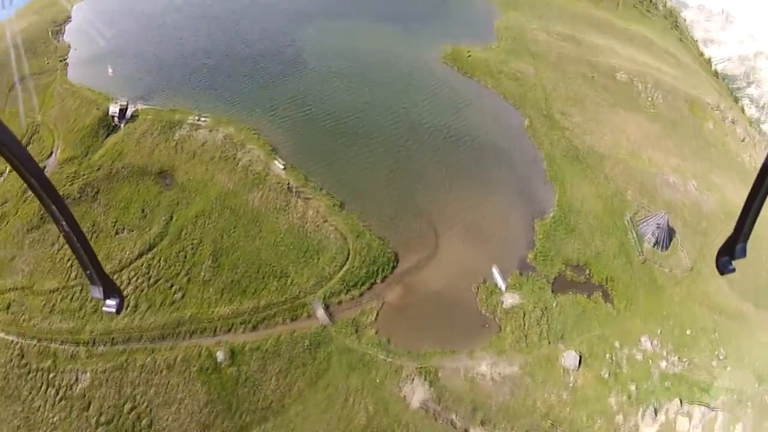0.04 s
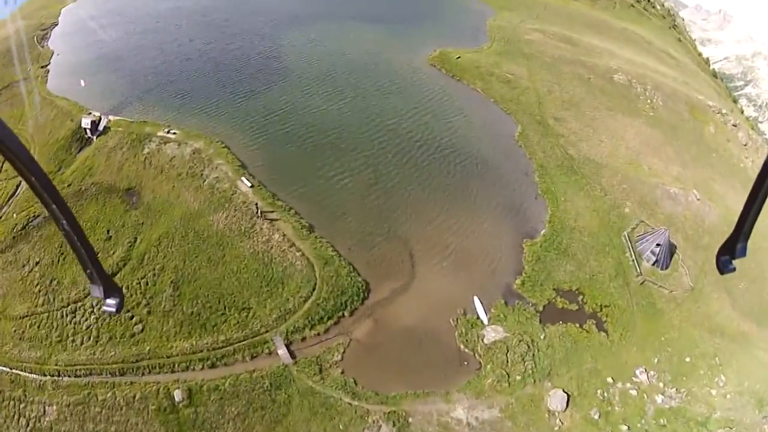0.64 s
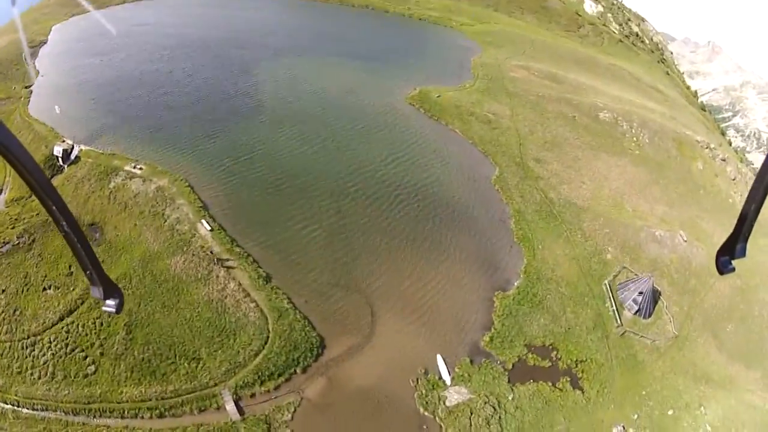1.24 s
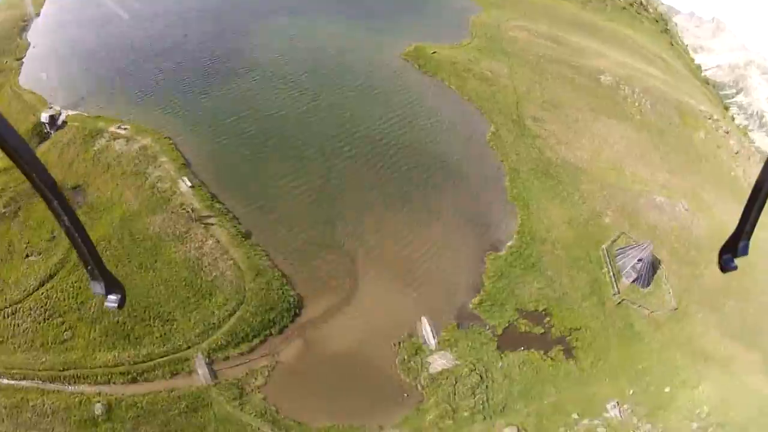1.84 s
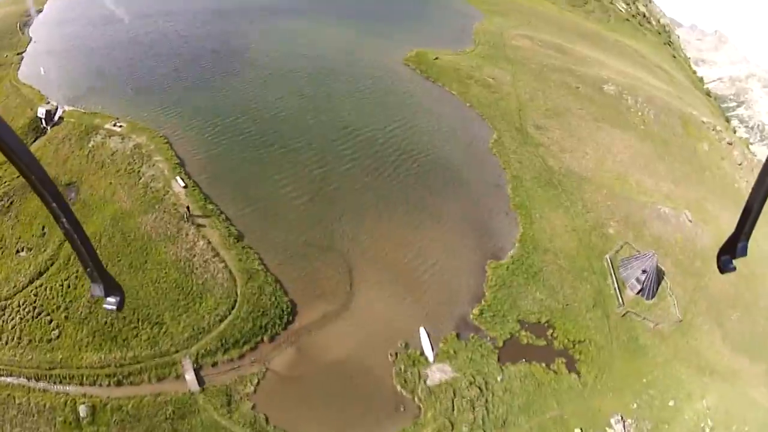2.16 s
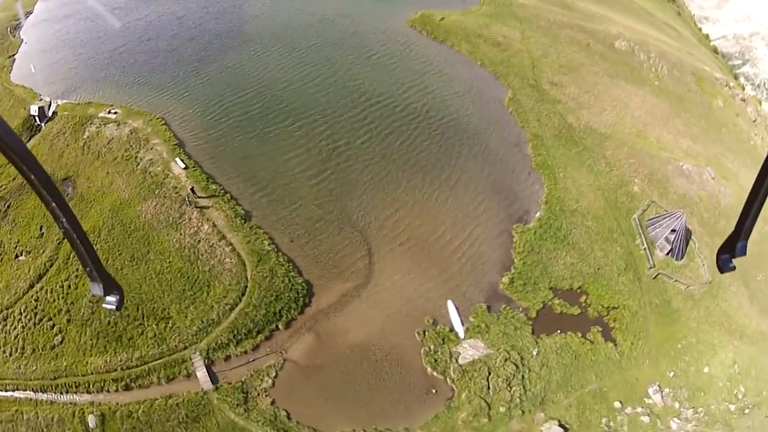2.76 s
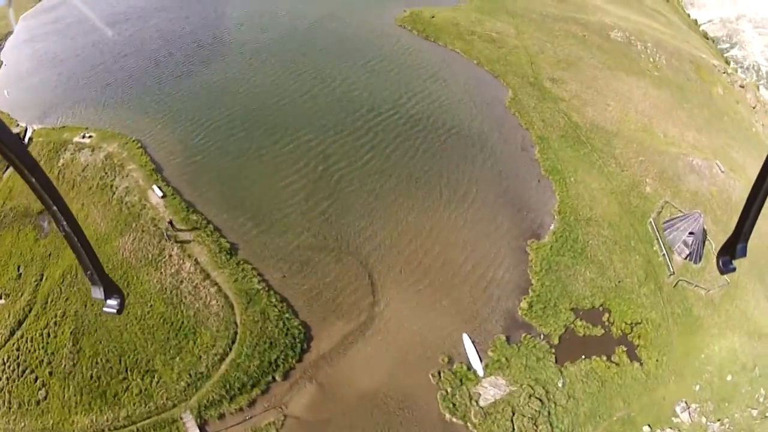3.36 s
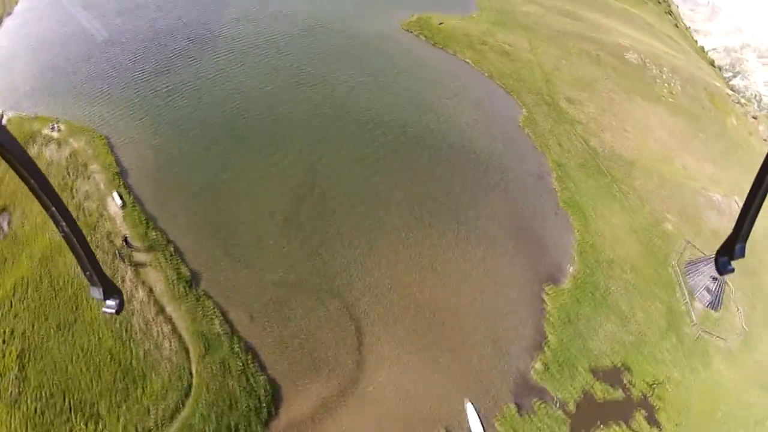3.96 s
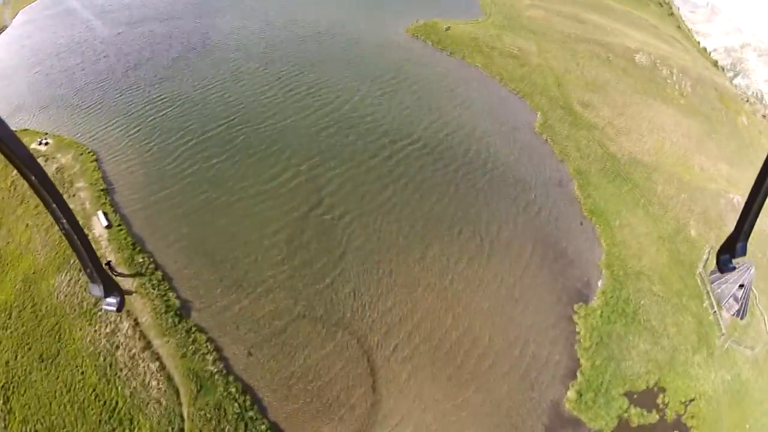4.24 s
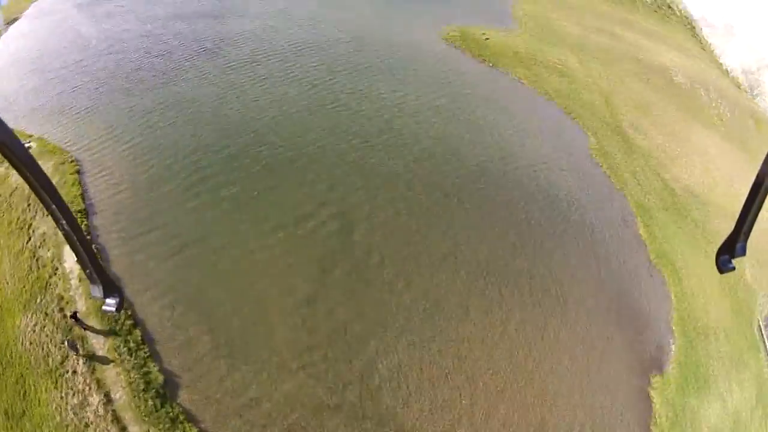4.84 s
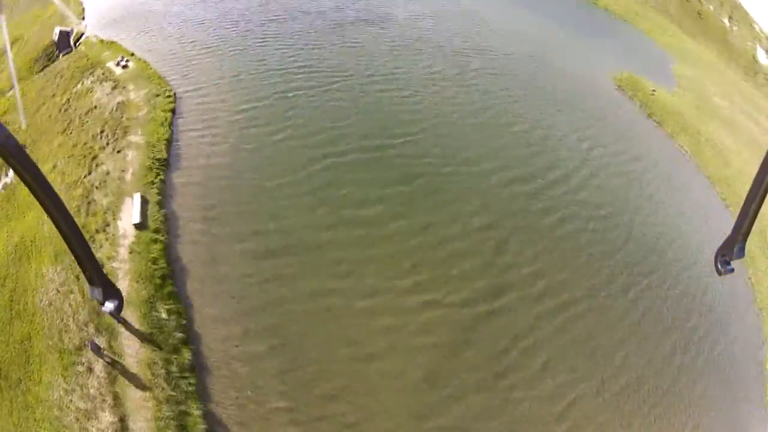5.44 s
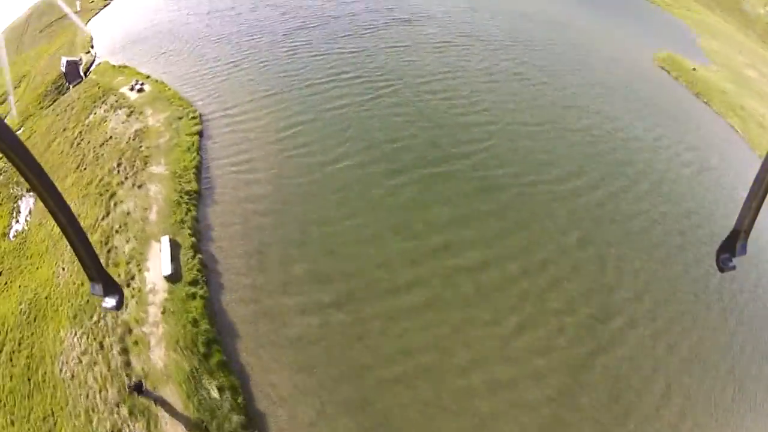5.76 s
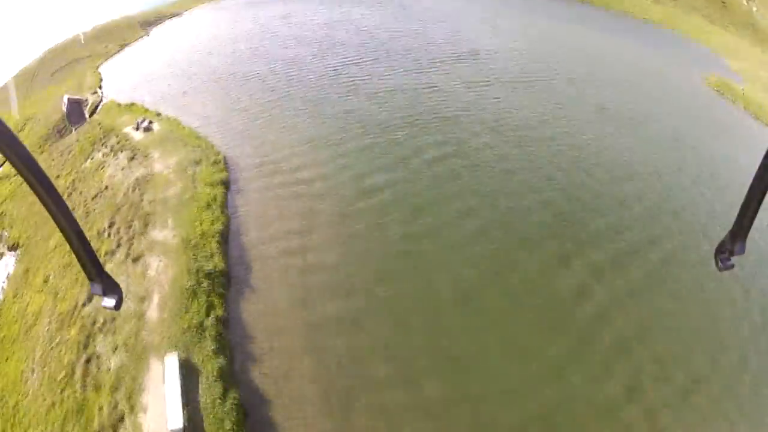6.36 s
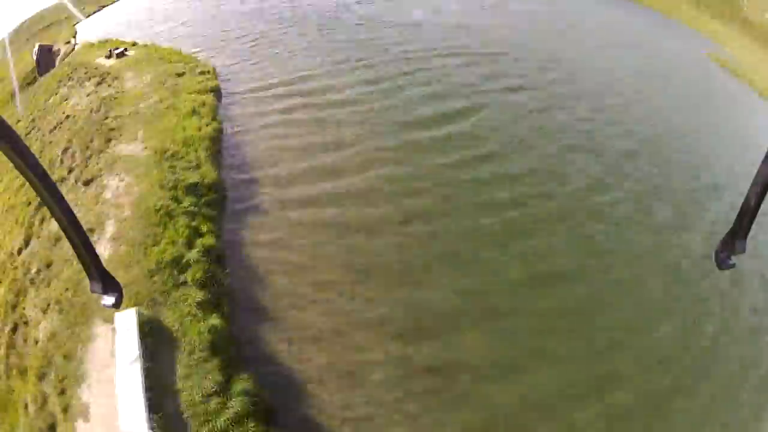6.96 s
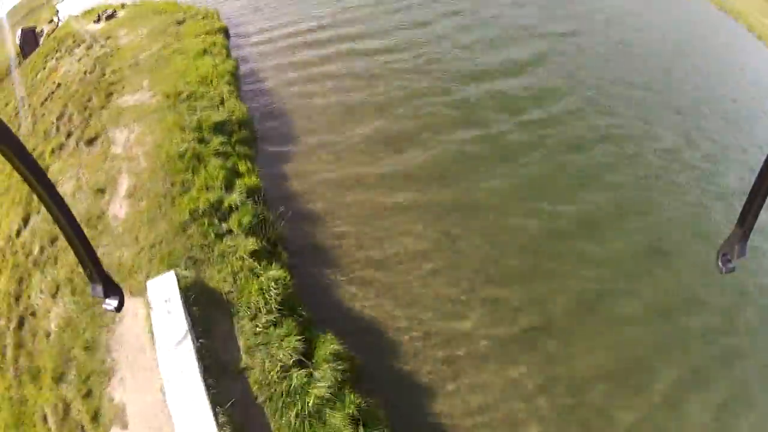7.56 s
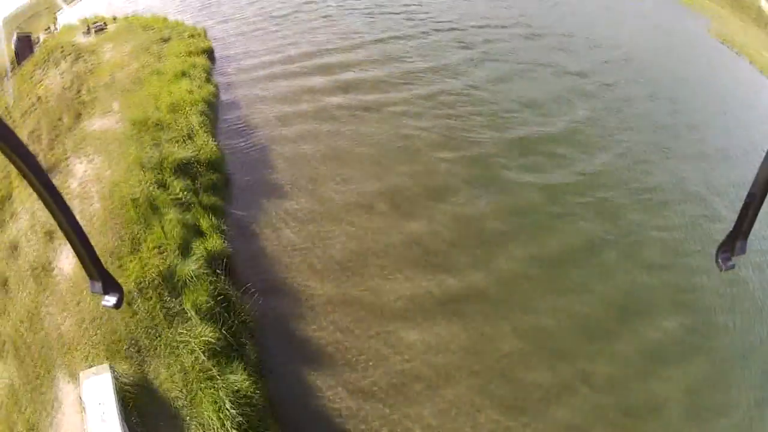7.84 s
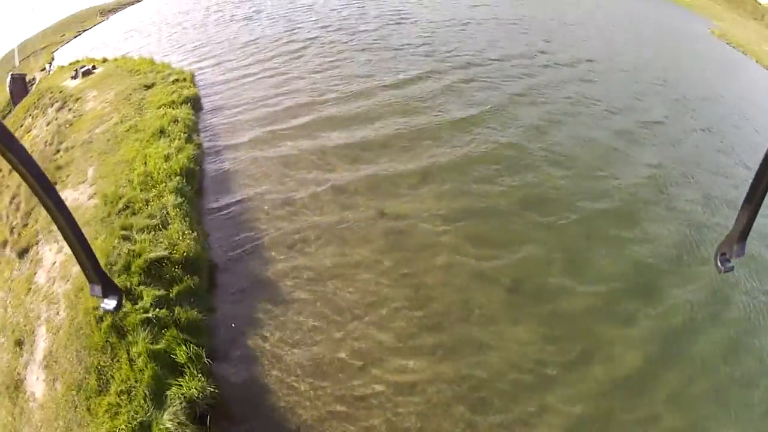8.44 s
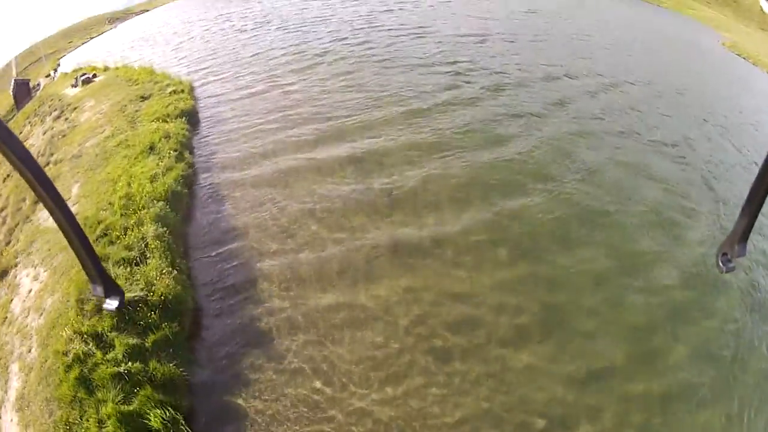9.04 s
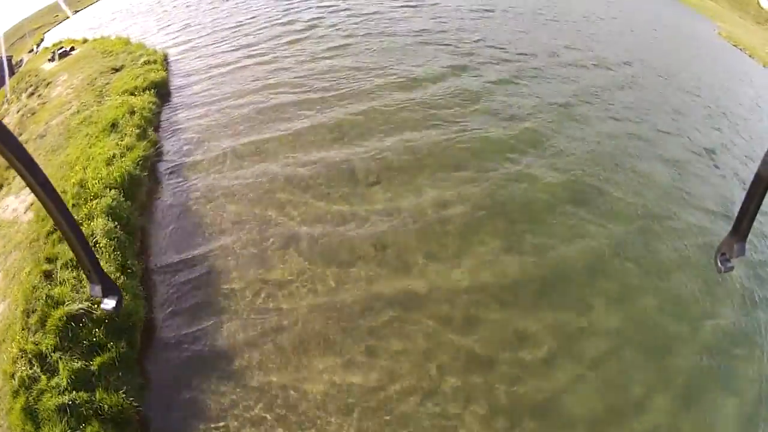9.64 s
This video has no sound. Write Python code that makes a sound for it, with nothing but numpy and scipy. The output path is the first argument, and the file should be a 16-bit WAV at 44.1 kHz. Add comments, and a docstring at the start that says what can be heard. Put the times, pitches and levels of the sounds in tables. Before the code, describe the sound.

A multirotor drone flies low over a lake, heard from a microphone hanging right beneath it. The rotors hum at a wavering pitch over roaring downwash and low wind. After about three seconds they surge in short bursts, with flickers of high motor whine. From around six seconds they buzz and hiss much harder, and gusts thump the microphone. The sound cuts out for an instant near eight seconds, then returns at full effort.

```python
"""Low over a lake, at the camera hanging under a multirotor drone.
Two rotor pairs hum at shifting speeds; with effort they buzz and their wash churns and hisses.
Wind buffets the microphone, with frequent thumps in fast flight. The motors whine in spells.
The camera samples slowly and holds each sample, which adds a gritty treble."""
import sys
import numpy as np
from scipy import signal
from scipy.fft import rfft, irfft, next_fast_len
from scipy.io import wavfile
from scipy.ndimage import uniform_filter1d, minimum_filter1d, map_coordinates

SR = 44100
rng = np.random.default_rng(int(sys.argv[2]) if len(sys.argv) > 2 else 0)


def generate_wav(sig):
    """Save sig (samples, or channels by samples) to the path in sys.argv[1] as 16-bit PCM at SR."""
    pcm = np.round(np.clip(np.atleast_2d(sig).T, -1, 1) * 32767).astype(np.int16)
    wavfile.write(sys.argv[1], SR, pcm)


N = 427769
TIME_S = np.arange(N) / SR


def amp(db):
    """Decibels to gain."""
    return 10 ** (np.asarray(db) / 20)


def unit_rms(x):
    """Scale to rms 1."""
    return x / np.sqrt(np.mean(x ** 2) + 1e-20)


def curve(rows):
    """Breakpoints (time_s, value), interpolated per sample."""
    return np.interp(TIME_S, *np.transpose(rows))


def trapezoid(start_s, end_s, rise_s):
    """Gate with linear rise and fall."""
    return np.clip(np.minimum(TIME_S - start_s, end_s - TIME_S) / rise_s, 0, 1)


def spells(rows, rise_s):
    """Summed trapezoid boosts, in dB."""
    return sum(boost_db * trapezoid(start_s, end_s, rise_s) for start_s, end_s, boost_db in rows)


def wobble(rate_hz):
    """Smooth random curve, rate_hz knots a second."""
    knots = rng.standard_normal(int(N * rate_hz / SR) + 4)
    return map_coordinates(knots, [TIME_S * rate_hz])


def filtered(x, response):
    """FFT filter with gain response(hz)."""
    size = next_fast_len(N + 8192)
    return irfft(rfft(x, size) * response(np.fft.rfftfreq(size, 1 / SR)), size)[:N]


def turbulence(spectrum, patchy_db):
    """Coloured noise, rms 1; eddies are time-frequency patches of random gain."""
    bins = signal.stft(rng.standard_normal(N), nperseg=512)[2]
    eddies = uniform_filter1d(rng.standard_normal(bins.shape), size=8, axis=0)
    eddies = unit_rms(uniform_filter1d(eddies, size=10, axis=1))
    noise = signal.istft(bins * amp(patchy_db * eddies), nperseg=512)[1][:N]
    freq_hz, density_db = np.transpose(spectrum)
    colour = lambda hz: amp(np.interp(np.log(hz + 1), np.log(freq_hz), density_db, right=-120))
    return unit_rms(filtered(noise, colour))


def spin_phase(rate_hz, jitter):
    """Phase of a slightly unsteady rotation, in radians."""
    return 2 * np.pi * (np.cumsum(rate_hz * (1 + jitter * wobble(35))) / SR + rng.random())


def harmonics(phase, orders, rough_db):
    """Rotor harmonics, each shaken by the turbulence the blades cut."""
    return sum(amp(level_db + rough_db * wobble(30)) * np.sin(round(k) * phase + 2 * np.pi * rng.random())
               for k, level_db in orders)


def camera_case(x, ring_hz, width_hz, ring_db, cutoff_hz):
    """The case rings at one resonance and muffles what lies above."""
    ring = lambda hz: 1j * hz * width_hz / (ring_hz ** 2 - hz ** 2 + 1j * hz * width_hz)
    return filtered(x, lambda hz: (1 + amp(ring_db) * ring(hz)) / np.sqrt(1 + (hz / cutoff_hz) ** 14))


# Effort over an easy hover: time_s, effort_db
EFFORT_DB = [(0, 1), (1.5, 0.5), (2.7, 1), (3.25, 7), (3.72, 2), (4.4, 4.5), (5.68, 2.5), (5.74, 13),
             (6.09, 9), (6.19, 13), (6.85, 13.5), (7.28, 6), (7.44, 1), (7.98, 13.5), (8.12, 6), (8.38, 17),
             (9.0, 16.5), (9.7, 17.5)]
# Steadying surges: start_s, end_s, boost_db
SURGES_DB = [(.19, .265, 5), (.29, .44, 4.5), (.69, .78, 1), (3.43, 3.62, 3), (3.78, 3.87, 6),
             (3.98, 4.09, 3.5), (4.13, 4.27, 6), (4.66, 4.89, 6.5), (5.18, 5.38, 2.5), (7.17, 7.32, 5),
             (7.62, 7.71, 2.5)]


def rotor_effort():
    """How hard the rotors work, in dB; surges as the drone steadies itself."""
    return curve(EFFORT_DB) + spells(SURGES_DB, rise_s=0.027)


def driven_db(effort_db, hover_db, growth, waver_db):
    """Rotor level: grows with effort, wavers in turbulence."""
    return hover_db + growth * effort_db + waver_db * wobble(9)


# Speed hunting, most in the dive and level-out: time_s, speed_fraction
SPEED_HUNTING = [(2.8, 0.0031), (3.3, 0.0096), (5.6, 0.00793), (5.9, .018), (7.9, 0.0161), (8.4, 0.0062)]
# Frame shake against the blade tone: shaft_multiple, level_db
SHAFT_ORDERS_DB = [(1, -11.5), (3, -14), (4, -21)]
# Growl as the blades bite the air: start_s, end_s, boost_db
BITES_DB = [(.7, 1.6, 6), (4.66, 4.86, 2.5), (5.72, 6.02, 4), (6.6, 6.94, 5), (7.85, 8.02, 2.5)]


def rotor_pair(speed, hum_db, buzz_db, overtones, shaft_db, twin_buzz_db, twin_hum_db, detune):
    """Two rotors hunt around one speed and beat; returns sound and lead blade phase."""
    blade_hz = curve(speed)
    hunting = curve(SPEED_HUNTING)
    lead = spin_phase(blade_hz * (1 + hunting * wobble(11)), jitter=0.00792)
    twin_hz = blade_hz * (1 + detune + 0.016 * wobble(4) + hunting * wobble(11))
    twin = spin_phase(twin_hz, jitter=0.00903)
    hum = np.sin(lead) + amp(twin_hum_db) * np.sin(twin)
    # Two blades a turn: imbalance shakes the frame at multiples of half the blade rate.
    hum += amp(shaft_db) * harmonics(lead / 2, SHAFT_ORDERS_DB, rough_db=3)
    buzz = harmonics(lead, overtones, rough_db=2.5)
    buzz += amp(twin_buzz_db) * harmonics(twin, overtones, rough_db=5)
    buzz = camera_case(buzz, ring_hz=690, width_hz=170, ring_db=-5.5, cutoff_hz=740)
    bite_db = spells(BITES_DB, rise_s=0.063)
    return amp(hum_db) * hum + amp(buzz_db + bite_db) * buzz, lead


# Fast pair speed: time_s, blade_pass_hz
FAST_SPEED_HZ = [(0, 194), (.3, 189), (.7, 204), (1.0, 187), (1.3, 182), (1.75, 200), (2.0, 199),
                 (2.25, 207), (2.9, 195), (3.15, 209), (4.2, 206), (4.8, 192), (5.8, 225), (6.0, 212),
                 (6.4, 230), (6.63, 194), (6.88, 223), (7.2, 222), (7.5, 204), (7.9, 219), (8.4, 198),
                 (8.65, 206), (8.85, 193), (9.15, 207), (9.7, 202)]
# Blade overtones: multiple, level_db
FAST_OVERTONES_DB = [(2, 1.5), (3, -1), (4, -4), (5, -5)]
# Hum swells from frame shake: start_s, end_s, boost_db
FAST_SWELLS_DB = [(0, .34, 10.5), (.39, .75, 12), (.92, 1.1, 13.5), (1.15, 1.62, 12), (1.55, 1.87, 14.5),
                  (1.94, 2.25, 13.5), (2.41, 3.0, 12.5), (6.73, 6.89, 10), (8.33, 9.75, 5.5)]


def fast_rotors(effort_db):
    """The fast pair hums in the hover and buzzes hard under load."""
    hum_db = driven_db(effort_db, hover_db=-21.5, growth=0.03, waver_db=0.83)
    hum_db += spells(FAST_SWELLS_DB, rise_s=0.066)
    buzz_db = driven_db(effort_db, hover_db=-46.5, growth=1.474, waver_db=0.5)
    return rotor_pair(FAST_SPEED_HZ, hum_db, buzz_db, FAST_OVERTONES_DB,
                      shaft_db=0, twin_buzz_db=-5.5, twin_hum_db=-10, detune=0.048)


# Slow pair speed: time_s, blade_pass_hz
SLOW_SPEED_HZ = [(0, 176.3), (2.9, 182.2), (3.3, 165.7), (4.55, 183.2), (5.03, 171.5), (5.32, 147.9),
                 (5.5, 157.2), (5.68, 146.9), (5.77, 181.7), (6.05, 162.3), (6.25, 175), (6.6, 170.8),
                 (6.87, 190.6), (7.2, 171.8), (7.6, 167.3), (8.1, 175.2), (8.7, 169.1), (9.3, 174.1)]
# Blade overtones: multiple, level_db
SLOW_OVERTONES_DB = [(2, 3.5), (3, -1), (4, 0), (5, -3.5)]
# Hum swells from frame shake: start_s, end_s, boost_db
SLOW_SWELLS_DB = [(3.06, 3.34, 9), (3.4, 4.1, 6.9), (4.46, 4.63, 8), (4.97, 5.26, 9.3), (5.19, 5.47, 13.5),
                  (5.4, 5.72, 16.8), (7.49, 7.67, 12.4), (8.35, 9.75, 4.7)]


def slow_rotors(effort_db):
    """The slow pair hums loudest where it slows down."""
    hum_db = driven_db(effort_db, hover_db=-22.5, growth=0.18, waver_db=1)
    hum_db += spells(SLOW_SWELLS_DB, rise_s=0.066)
    buzz_db = driven_db(effort_db, hover_db=-45.5, growth=1, waver_db=1.1)
    return rotor_pair(SLOW_SPEED_HZ, hum_db, buzz_db, SLOW_OVERTONES_DB,
                      shaft_db=-8, twin_buzz_db=-9.5, twin_hum_db=-8.5, detune=-0.045)


# Downwash strength: time_s, flow_db
FLOW_DB = [(0, -21.5), (1.15, -16.5), (1.55, -18.5), (2.05, -20.5), (2.35, -19), (2.65, -20.5),
           (2.95, -18.5), (3.4, -21.5), (4.15, -20), (4.38, -17), (4.9, -20.5), (5.6, -18), (5.75, -21.5),
           (6.3, -21.5), (7.35, -22.5), (7.9, -25), (8.45, -21.5), (9.7, -22.5)]
# Downwash spectra: freq_hz, density_db
ROAR_SPECTRUM = [(40, -21), (80, -2), (135, 0), (175, 3.5), (235, 1), (295, -2), (370, -5), (480, -13),
                 (700, -20.5), (1500, -42.5)]
CHURN_SPECTRUM = [(200, -67), (350, -9.5), (450, 1), (550, 1), (640, 1.5), (730, -2), (830, -9.5),
                  (950, -20), (1300, -23), (2500, -62)]
HISS_SPECTRUM = [(500, -16), (1000, -6), (1500, -3), (1900, -0.5), (2250, 2), (2700, -5.5), (3150, -10.5),
                 (3800, -1.5), (4300, -5), (4900, -5), (5500, -9.5), (6000, -14.5)]


def downwash(effort_db, blade_phases, chop):
    """Air driven over the camera roars; effort adds churn and hiss. Each blade pass lifts the hiss."""
    flow_db = curve(FLOW_DB)
    strokes = unit_rms(np.exp(chop * sum(np.cos(phase) for phase in blade_phases)))
    roar_db = flow_db + 5 + 0.38 * wobble(20)
    roar = amp(roar_db) * turbulence(ROAR_SPECTRUM, patchy_db=1.1)
    churn_db = flow_db - 10.5 + 0.7 * effort_db + 0.65 * wobble(25)
    churn = amp(churn_db) * turbulence(CHURN_SPECTRUM, patchy_db=1)
    hiss_db = effort_db - 41.5 + 0.61 * wobble(14) + 0.88 * wobble(90)
    hiss = amp(hiss_db) * strokes * turbulence(HISS_SPECTRUM, patchy_db=0.98)
    return roar + churn + hiss


# Steady wind: time_s, level_db
BREEZE_DB = [(0, -17), (1.1, -17), (1.8, -18), (2.6, -14.5), (3.6, -14.5), (4.7, -14.5), (5.6, -25),
             (5.9, -13.5), (6.5, -16), (6.85, -21), (7.3, -14.5), (8.0, -17), (8.2, -27), (9.7, -23)]
# Single gusts: centre_s, peak_db
THUMPS_DB = [(.86, -11), (4.86, -7), (5.33, -10), (5.76, -10), (6.12, -7.5), (6.56, -11), (6.95, -8.5),
             (7.08, -8), (7.21, -13), (7.31, -9.5), (7.40, -9.5), (7.67, -14), (8.211, -7.5), (8.32, -12),
             (8.47, -10.5), (8.63, -8.5), (8.78, -8.5), (8.96, -4), (9.12, -10), (9.25, -15.5),
             (9.36, -9.5), (9.48, -7.5), (9.61, -6), (9.69, -10)]
# Rumble against buffet: time_s, relative_db
RUMBLE_DB = [(0, -12), (1, -12), (2.5, -10.5), (5.4, -8), (6, -9.5), (8, -3.5), (8.5, 0), (9.7, -3)]
# Wind spectra: freq_hz, density_db
BUFFET_SPECTRUM = [(20, -31), (45, -13.5), (80, 3), (120, 2), (160, -0.5), (260, -17), (600, -59)]
RUMBLE_SPECTRUM = [(8, -33), (22, -14), (38, -6.5), (60, -4), (110, -13), (300, -56)]


def wind(thump_width_s=0.022):
    """Breeze and single gusts buffet the microphone, deeper at speed."""
    breeze = amp(curve(BREEZE_DB) + 0.66 * wobble(14))
    thumps = sum(amp(peak_db) * np.exp(-((TIME_S - centre_s) / thump_width_s) ** 2)
                 for centre_s, peak_db in THUMPS_DB)
    buffet = turbulence(BUFFET_SPECTRUM, patchy_db=0.5)
    rumble = amp(curve(RUMBLE_DB)) * turbulence(RUMBLE_SPECTRUM, patchy_db=0.5)
    return np.hypot(breeze, thumps) * (buffet + rumble)


# Motor whine: start_s, end_s, pitch_hz, level_db
WHINE_SPELLS = [(1.896, 2.521, 4300, -46), (2.15, 2.52, 4470, -46), (3.097, 3.2, 4970, -35.5),
                (3.12, 3.35, 3915, -42), (3.329, 3.67, 3860, -46), (3.275, 3.345, 4850, -42),
                (3.38, 3.533, 4925, -43), (3.555, 3.633, 4925, -40), (3.835, 3.902, 4960, -42),
                (4.013, 4.08, 5050, -39), (4.777, 4.835, 4958, -36), (6.872, 6.936, 4850, -37),
                (7.013, 7.09, 4450, -35), (7.945, 8.02, 4960, -37), (8.402, 8.523, 4705, -36),
                (8.739, 9.07, 4670, -33), (9.34, 9.5, 4937, -33), (9.53, 9.749, 4960, -31)]


def motor_whine():
    """The motors whine in short fluttering spells."""
    whine = np.zeros(N)
    for start_s, end_s, pitch_hz, level_db in WHINE_SPELLS:
        gate = trapezoid(start_s, end_s, rise_s=0.024)
        phase = spin_phase(pitch_hz * (1 + 0.002 * wobble(9)), jitter=0.00202) + 0.42 * wobble(200)
        whine += gate * amp(level_db + 2.6 * wobble(45)) * np.sin(phase)
    return whine


def scene():
    """Mono mix at the camera; one effort curve drives rotors and downwash."""
    effort_db = rotor_effort()
    fast, fast_phase = fast_rotors(effort_db)
    slow, slow_phase = slow_rotors(effort_db)
    air = downwash(effort_db, [fast_phase, slow_phase], chop=0.052) + wind()
    return (fast + slow + air + motor_whine())[None]


# Brief level dip: time_s, gain
DIP_GAIN = [(8.02, 0.87), (8.055, 0.36), (8.077, 0.021), (8.105, 0.58), (8.17, 1)]


def record(dry):
    """The level dips once; a limiter rounds peaks; sample-and-hold mirrors sound into the treble."""
    hold_hz, cutoff_hz, limiter_samples = 12000, 15000, 89
    dipped = dry[0] * curve(DIP_GAIN)
    limiter_gain = minimum_filter1d(1 / np.maximum(np.abs(dipped), 1), limiter_samples)
    limited = dipped * uniform_filter1d(limiter_gain, limiter_samples)
    held = np.repeat(signal.resample_poly(limited, hold_hz, SR), 4)
    gritty = signal.resample_poly(held, SR, 4 * hold_hz)[:N]
    return filtered(gritty, lambda hz: hz < cutoff_hz)[None, :]


dry = scene()
out = record(dry)
generate_wav(out)
```